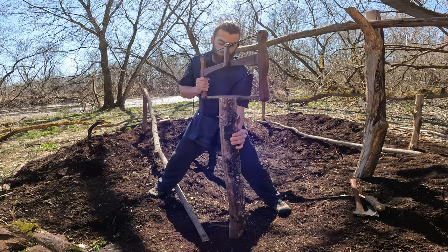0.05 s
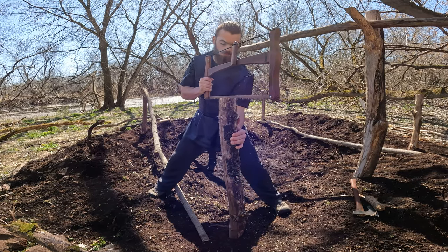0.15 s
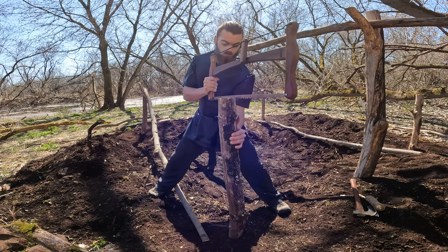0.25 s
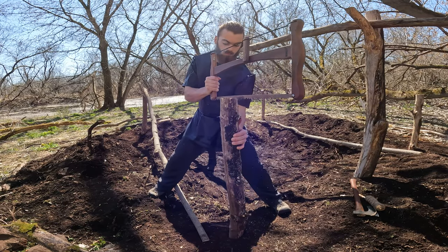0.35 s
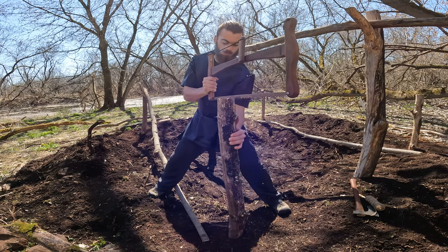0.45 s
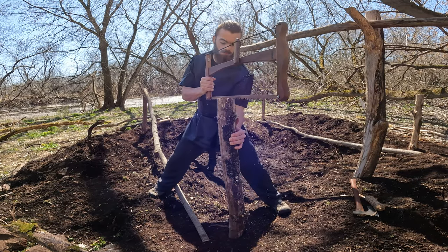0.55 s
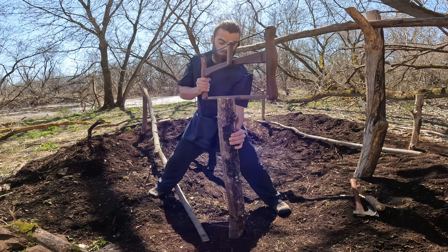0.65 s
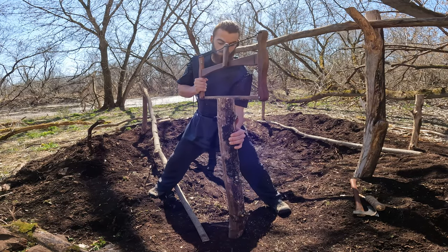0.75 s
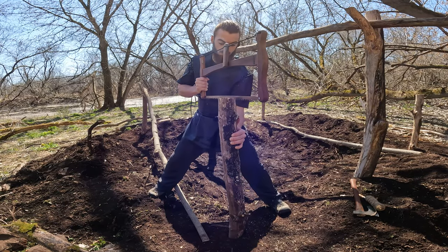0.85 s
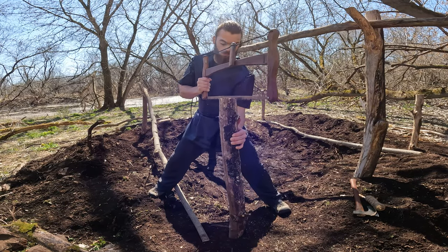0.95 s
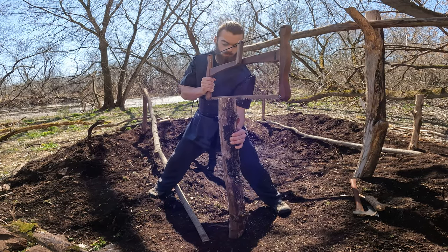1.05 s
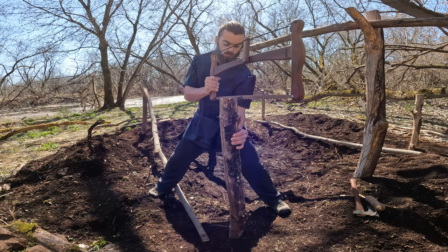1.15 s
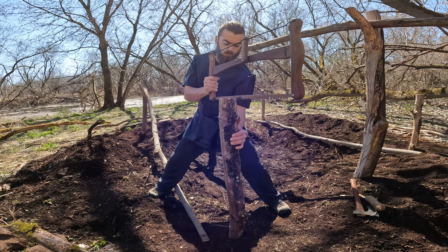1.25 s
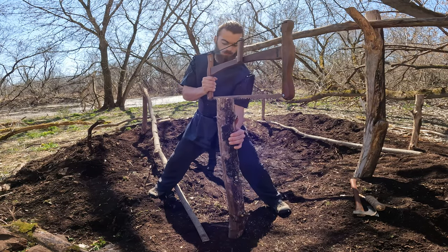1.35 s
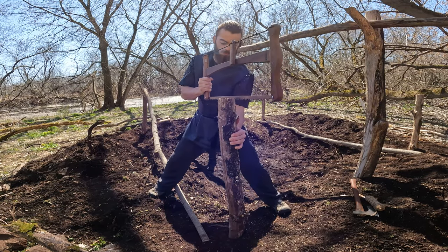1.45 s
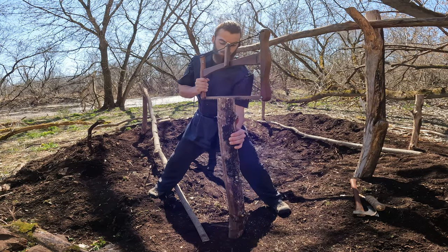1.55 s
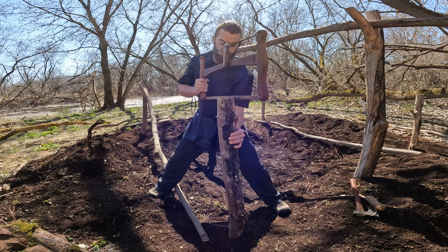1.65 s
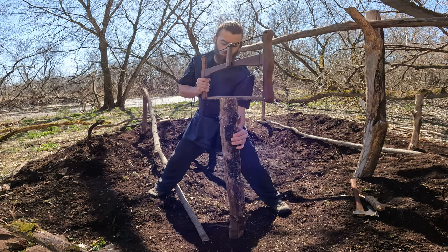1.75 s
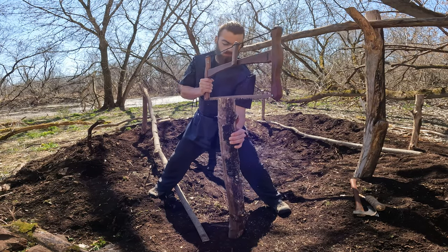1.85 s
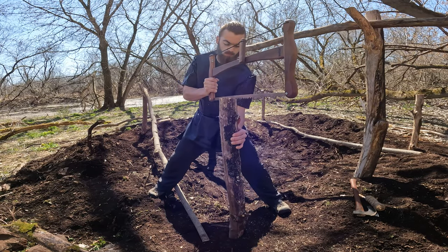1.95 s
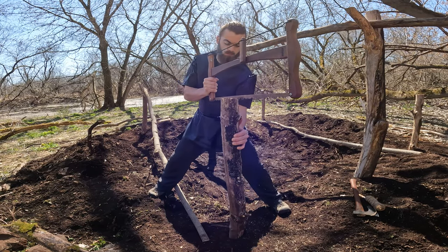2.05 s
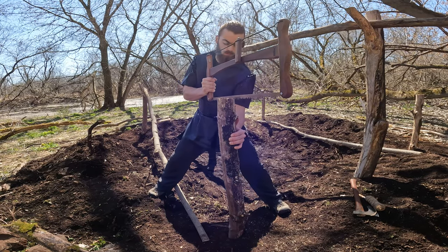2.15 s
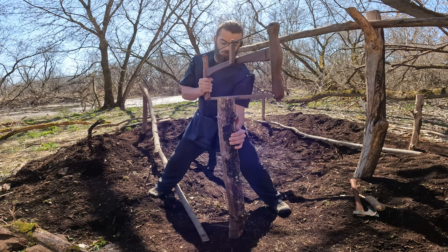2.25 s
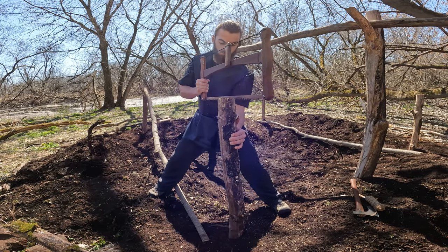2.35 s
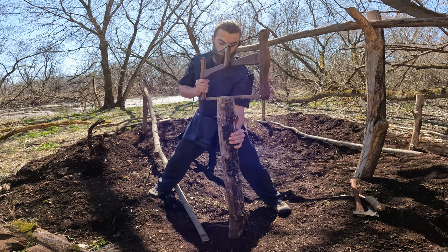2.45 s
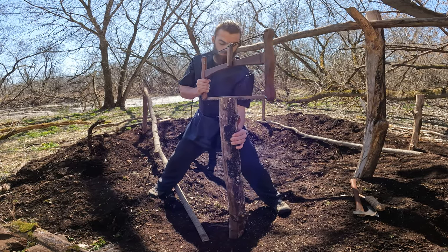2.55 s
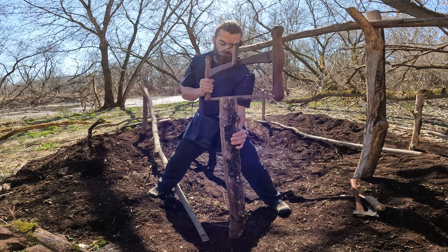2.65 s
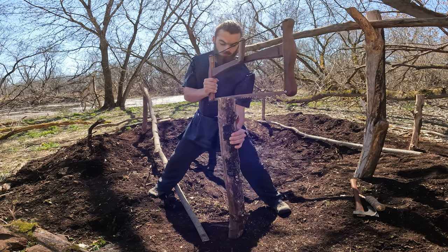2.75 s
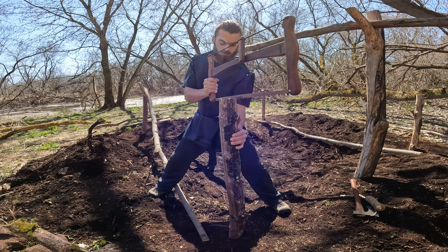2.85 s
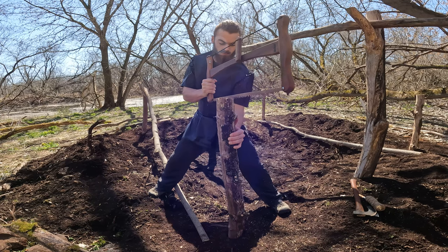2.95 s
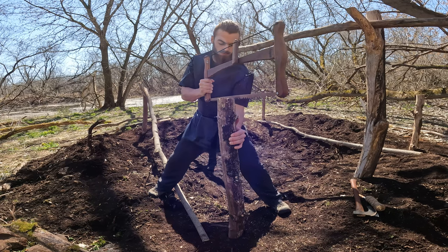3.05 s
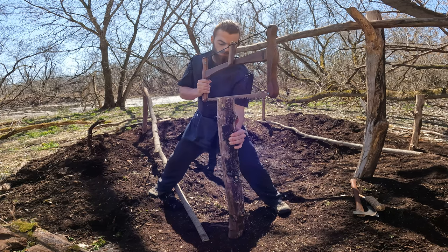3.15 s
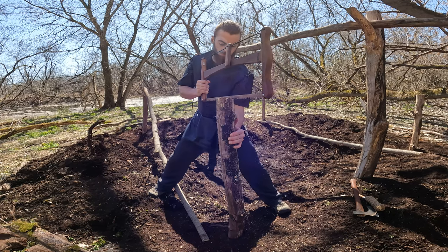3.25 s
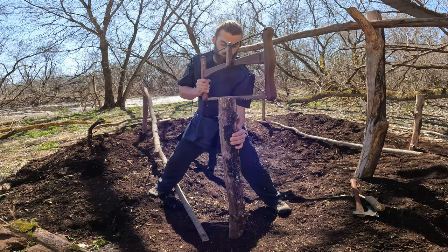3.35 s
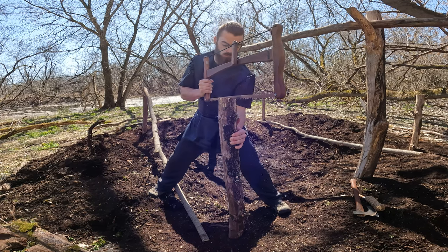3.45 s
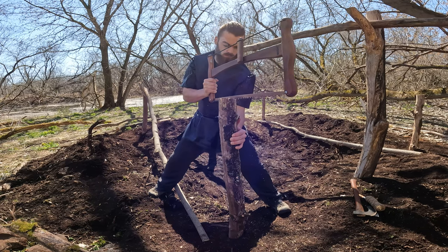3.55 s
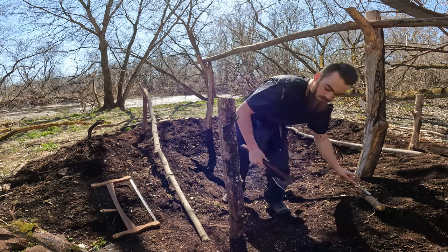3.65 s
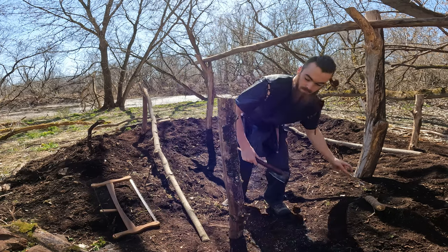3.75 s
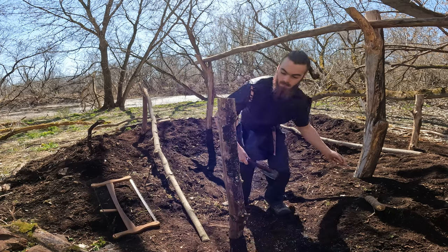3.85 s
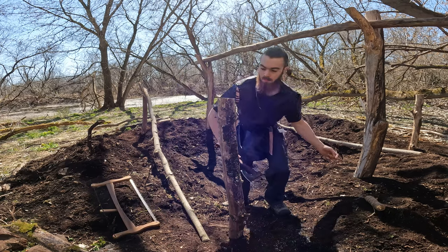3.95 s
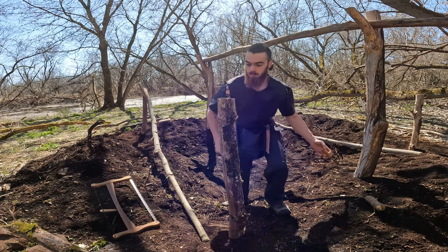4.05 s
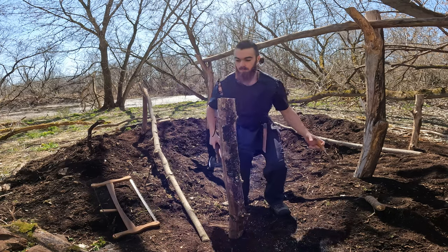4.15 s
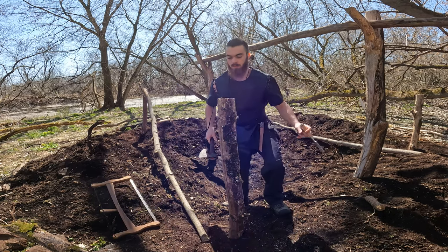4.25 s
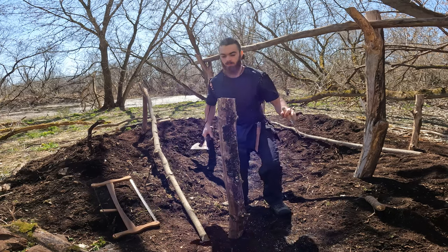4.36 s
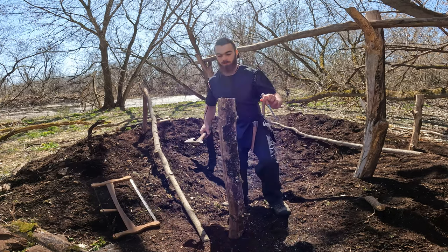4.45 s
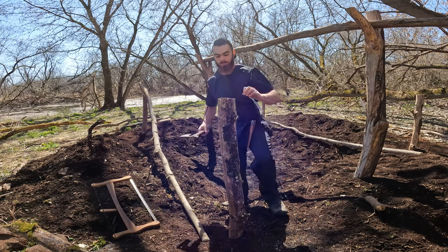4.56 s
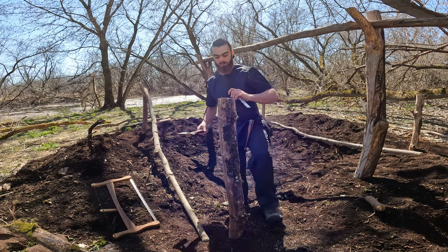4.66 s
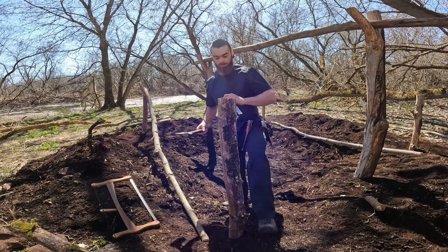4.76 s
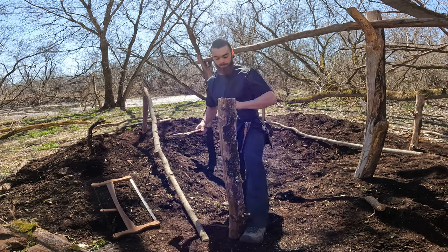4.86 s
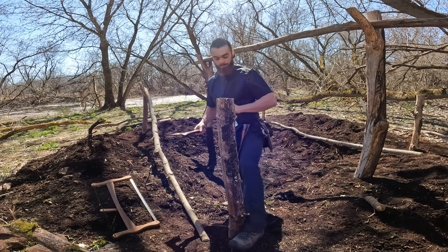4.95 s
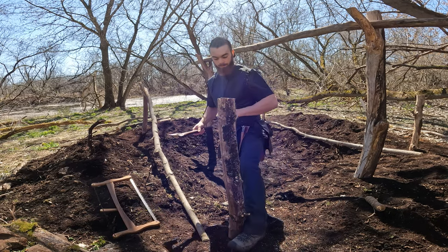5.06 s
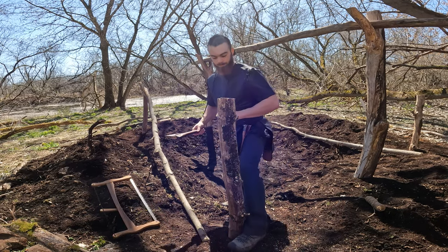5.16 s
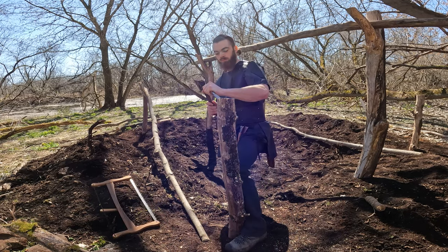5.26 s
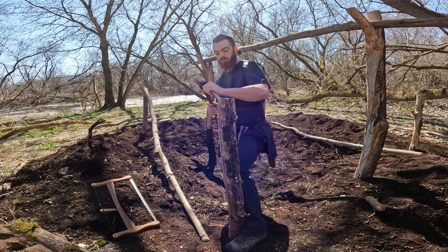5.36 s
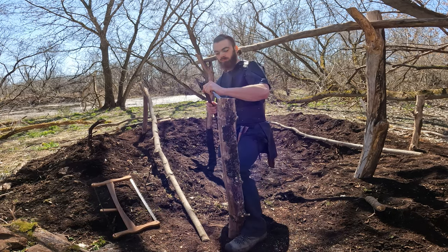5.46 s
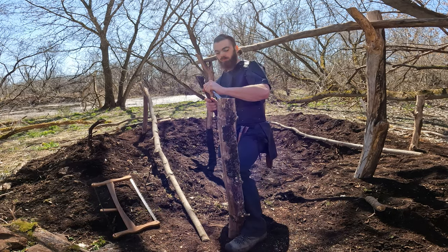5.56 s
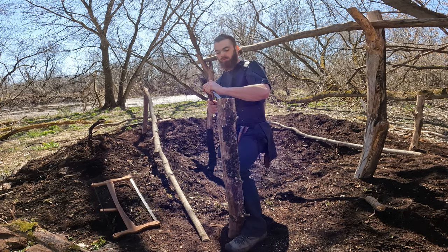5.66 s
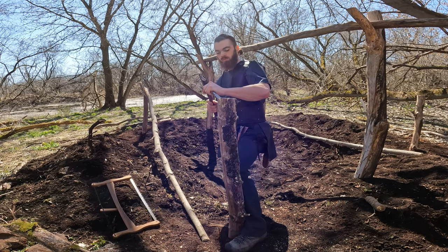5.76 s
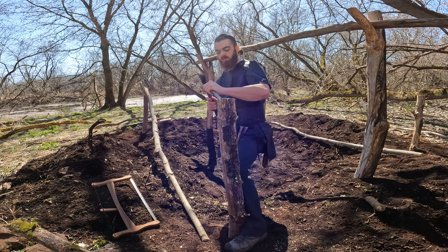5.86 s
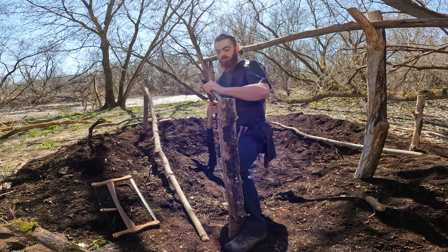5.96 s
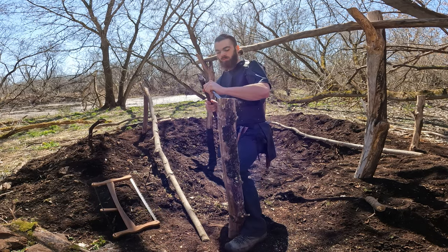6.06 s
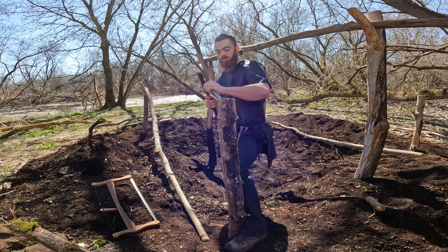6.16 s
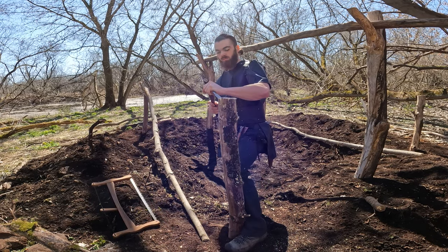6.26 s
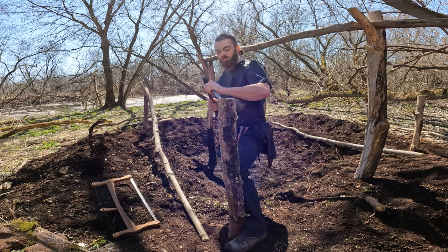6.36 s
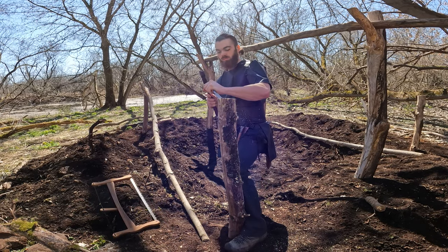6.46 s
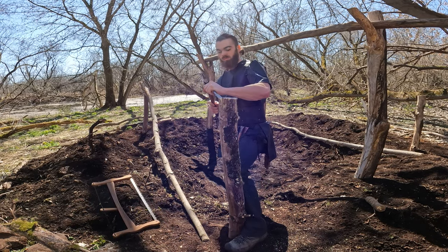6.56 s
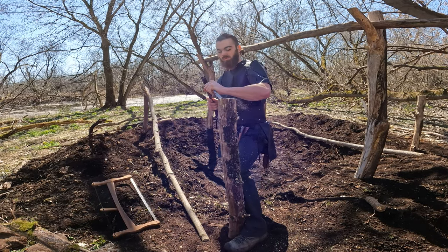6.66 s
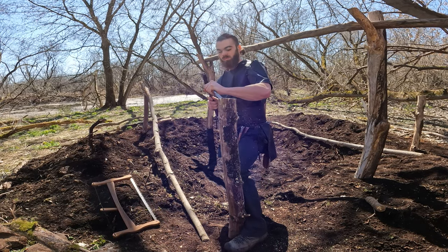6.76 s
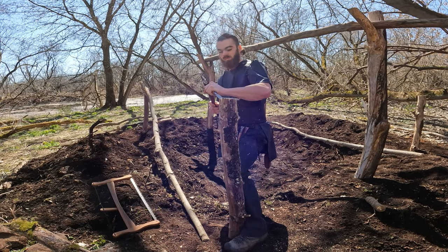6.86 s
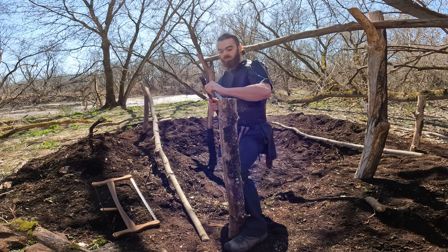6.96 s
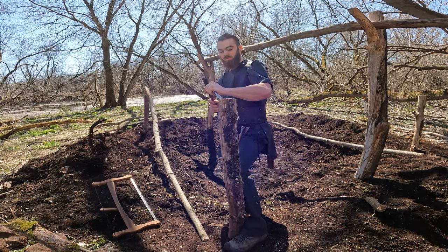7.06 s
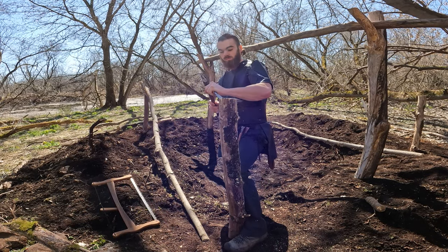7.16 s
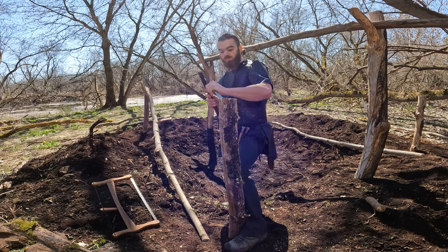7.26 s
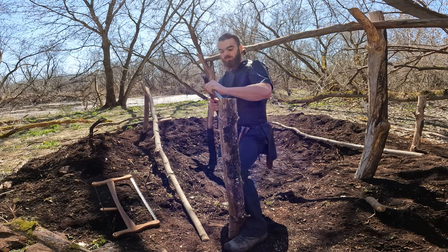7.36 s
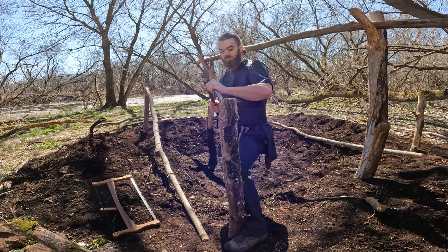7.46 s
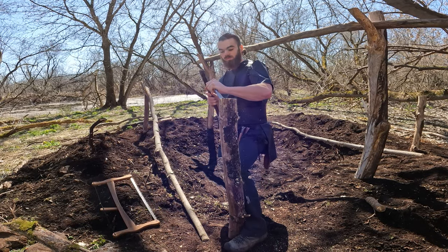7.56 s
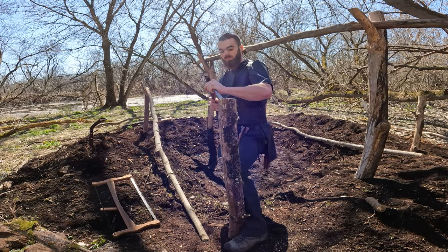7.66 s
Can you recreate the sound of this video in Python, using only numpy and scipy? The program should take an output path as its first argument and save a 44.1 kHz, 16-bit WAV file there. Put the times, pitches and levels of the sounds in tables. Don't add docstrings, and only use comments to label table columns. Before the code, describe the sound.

A bow saw rasps back and forth through a wooden post close by, then eight dry, spaced knocks tap a wedge in, outdoors.

```python
import sys
import numpy as np
from scipy import signal
from scipy.fft import rfft, irfft, next_fast_len
from scipy.io import wavfile
from scipy.ndimage import uniform_filter1d

SR = 44100
rng = np.random.default_rng(int(sys.argv[2]) if len(sys.argv) > 2 else 0)


def makeup_ratio(level_db):
    decades = np.asarray(level_db, float) / 20
    return 10 ** decades


def int16_out(signal):
    q = np.round(np.clip(np.atleast_2d(signal).T, -1, 1) * 32767)
    wavfile.write(sys.argv[1], SR, q.astype(np.int16))


N = 339570
CUT_S, LAST_CUT_S = 3.6305, 5.262
GHOST_S = 512 / 48000


def evened(x):
    return x / np.sqrt(np.mean(x ** 2) + 1e-20)


def read(points, hz):
    f, value = np.transpose(points)
    return np.interp(np.log(hz + 1), np.log(f + 1), value)


def add(mix, s, sound):
    part = mix[..., round(s * SR):][..., :sound.shape[-1]]
    part += sound[..., :part.shape[-1]]


def filtered(x, order, hz, kind="low"):
    return signal.sosfilt(signal.butter(order, hz, kind, fs=SR, output="sos"), x)


def dull(x, hz):
    return filtered(x, 6, hz)


def resonate(x, hz, width):
    r = np.exp(-np.pi * width / SR)
    return 2 * signal.lfilter([1 - r], [1, -r * np.exp(2j * np.pi * hz / SR)], x).real


def resonate_twice(x, hz, width):
    return resonate(resonate(x, hz, width), hz, width)


def body(x, modes):
    rung = [makeup_ratio(db) * resonate_twice(x, hz, 1.25 * width) for hz, width, db in modes]
    return evened(sum((-1) ** k * mode for k, mode in enumerate(rung)))


def ring(hz, t60, rise=0.):
    t = np.arange(round(.06 * SR)) / SR
    return makeup_ratio(-60 * t / t60) * (1 - np.exp(-t / (rise + 1e-5))) * np.sin(2 * np.pi * hz * t)


def patchwork(shape, bands, frames):
    patches = uniform_filter1d(rng.standard_normal(shape), size=bands, axis=0)
    return evened(uniform_filter1d(patches, size=frames, axis=1))


# (time [s], half length [s], ring gain [dB], # boom
# gain [dB])
DIGS = [(0.355, 0.036, 6, -1.5), (0.291, 0.011, -5, 2), (0.776, 0.019, 8, 3.5), (0.844, 0.03, 7.5, 0.5),
        (1.202, 0.067, 5.5, -3.5), (1.141, 0.062, 3, 8), (1.62, 0.025, 4.5, 2.5), (1.687, 0.035, 3.5, 6),
        (1.914, 0.018, -15, 2), (2.034, 0.036, 5.5, -1.5), (2.488, 0.085, 2, 10.5), (3.12, 0.016, -9, -2),
        (3.526, 0.013, -21, 0), (3.608, 0.039, -1.5, 8.5), (2.858, 0.031, 6.5, -8), (3.19, 0.019, 11, -4),
        (3.278, 0.014, 10.5, 8.5), (3.354, 0.032, 6, 4), (0.053, .012, 3.5, -2), (0.183, 0.02, -15, 1),
        (0.256, 0.01, 0.5, 2.5), (1.297, 0.01, 2.5, 1), (1.514, 0.011, -2.5, -4), (1.554, 0.022, 1, -2),
        (2.089, 0.0063, 6, 0), (2.13, 0.006, 7.5, -4), (2.568, 0.028, 5, -2), (2.763, 0.011, 6, 1),
        (2.812, .015, -3.5, 4), (2.822, 0.0061, 2, -5), (2.937, 0.013, -4, -3), (3.155, 0.008, 1.5, 6),
        (3.307, .008, -2.5, 11)]


def contact(t, full, lift, full_db, lift_db, boom_db):
    edge_s, bend = 0.045, 1.11
    enter = 17.5 * (np.maximum(full - t, 0) / edge_s) ** bend
    leave = 27 * (np.maximum(t - lift, 0) / edge_s) ** bend
    ring_gain, boom_gain = sum(np.outer([a, b], np.exp(-((t - s) / half) ** 2)) for s, half, a, b in DIGS)
    ring_db = np.interp(t, [full, lift], [full_db, lift_db]) + ring_gain - enter - leave
    boom_db = boom_db + boom_gain - 0.38 * enter + 0.18 * leave
    knock_db = -3 + 0.023 * ring_gain - 0.28 * enter + 0.37 * leave
    return ring_db, boom_db, knock_db


# (frequency [Hz], width [Hz], level [dB])
POST_BOOM = [(197.7, 66, -4.5), (300, 86.5, 2), (553, 99, -12)]
# (frequency [Hz], width [Hz], level [dB])
POST_KNOCK = [(649.5, 123, 1.5), (955, 233, -3), (1400, 650, -11), (1645, 183, -2.5)]
# (frequency [Hz], width [Hz], level [dB])
BLADE = [(2160, 453, -0.5), (2875, 234, 2), (3262, 266, 2), (3693, 180, 0)]
# (frequency [Hz], density [dB per Hz])
FIZZ = [(2500, -24), (3900, -2.5), (4300, -5), (4700, -3.5), (6100, -5), (8300, -16.5), (9500, -18.5),
        (10300, -25.5), (12500, -28.5), (14300, -45), (15300, -53)]


def stroke(row, luck):
    t = np.arange(max(row[0] - 0.09, 0), min(row[1] + 0.09, CUT_S), 1 / SR)
    ring_db, boom_db, knock_db = contact(t, *row)
    fizz_db = -6.0 - 0.091 * (ring_db + 40.5)
    chance, size, sign, slow, other = luck[round(t[0] * SR):][:len(t)].T
    strength = makeup_ratio(1.25 * np.minimum(-np.log(size + 1e-9), 4))
    bites = (chance < 7000 / SR) * strength * np.sign(sign - .5)
    catch = evened(resonate(slow - .5, 94, 440))
    clump = evened(resonate(slow - .5, 22, 33))
    grip = makeup_ratio(2.0 * catch + 0.067 * clump)
    shared, apart = evened(bites * grip), evened((other - .5) * grip)
    pair = np.array([shared + 0.076 * apart, shared - 0.38 * apart])
    length = next_fast_len(len(t))
    colour = makeup_ratio(read(FIZZ, np.fft.rfftfreq(length, 1 / SR)))
    fizz = irfft(rfft(pair, length) * colour, length)[:, :len(t)]
    boom = makeup_ratio(boom_db) * body(shared, POST_BOOM)
    knock = makeup_ratio(knock_db) * body(shared + 0.54 * (pair - shared), POST_KNOCK)
    sound = makeup_ratio(ring_db) * (boom + knock + body(pair, BLADE) + makeup_ratio(fizz_db) * evened(fizz))
    edge = np.minimum(1, np.minimum(t - t[0] + 0.0007, t[-1] - t) / 0.0032)
    return t[0], sound * edge


# (teeth fully in [s], teeth lifting [s], blade ring when in [dB],
# blade ring at lifting [dB], post boom over the ring [dB])
STROKES = [
    (0.0, 0.037, -34.5, -46, -3.5),
    (0.245, 0.419, -35, -34, 1.5),
    (0.682, 0.915, -39, -44.5, 0.5),
    (1.081, 1.285, -40, -36.5, 0),
    (1.514, 1.726, -37, -43, -2),
    (1.982, 2.077, -29, -37, 0),
    (2.363, 2.521, -39, -40.5, -8),
    (2.725, 2.9, -40, -31.5, 1),
    (3.158, 3.351, -41.5, -46.5, -5.5),
    (3.573, 3.618, -38.5, -26.5, -9),
]


def bow_saw():
    saw, luck = np.zeros((2, N)), rng.random((N // 2, 5))
    for row in STROKES:
        add(saw, *stroke(row, luck))
    return saw


def mottled(x):
    z = signal.stft(x, nperseg=256)[2]
    grain_db = 2 * patchwork(z.shape[1:], 3, 7)
    return signal.istft(z * makeup_ratio(grain_db), nperseg=256)[1][:, :N]


# (frequency [Hz], t60 [s], level [dB], what drives it, sign of first motion)
TAP_MODES = [(135, .0036, 21, "post", 1), (152, .031, -2.7, "post", -1), (315, .0245, 1.2, "post", -1),
             (571, .0095, 3.9, "seated", -1), (616, .0029, 5.6, "seated", 1),
             (1212, .0087, -8.5, "seated", -1), (1657, .018, -8, "seated", -1),
             (1139, .004, 15, "split", 1), (1180, .0063, 11, "split", -1), (1792, .0108, -12.8, "edge", 1),
             (1984, .0118, -15.6, "edge", 1), (1050, .02, 0.1, "loose", -1), (2090, .012, -5, "loose", -1),
             (1320, .016, -10, "seated", -1)]
# (frequency [Hz], t60 [s], level [dB], what drives it, signed first motion)
TOOL_MODES = [(2810, 0.0065, -2, "crack", 0.92), (3740, 0.0076, -15, "crack", -0.56),
              (4700, 0.011, -13, "crack", -1.07), (7730, 0.0065, -18, "crack", 1)]
ARRIVE_S = dict(post=0, crack=.00024, seated=.00048, edge=.00072, loose=.00087, split=.00103)


def tap(blow_db, seated_db, loose_db, crack_db):
    modes, t = TAP_MODES + TOOL_MODES, np.arange(round(.065 * SR)) / SR
    detune = 1 + .004 * rng.standard_normal(len(modes))
    drive = dict(post=0, seated=seated_db, loose=loose_db, crack=crack_db,
                 edge=3 * seated_db, split=0.1 * seated_db)
    grit = resonate_twice(rng.standard_normal(len(t)), 2600, 3200)
    sound = evened(grit) * makeup_ratio(crack_db - 14.5 - 60 * t / 0.024)
    for (hz, t60, db, by, way), d in zip(modes, detune):
        add(sound, ARRIVE_S[by], way * makeup_ratio(db + drive[by]) * ring(hz * d, t60, rise=0.057 / hz))
    return makeup_ratio(blow_db) * filtered(sound, 2, [75, 7400], "band")


# (time [s], blow [dB], seated-wedge ring [dB], loose-wedge ring [dB], crack [dB])
TAPS = [
    (5.5519, -4.5, -3.5, -4, -9),
    (5.84, -0.5, -1.5, -9.5, -7),
    (6.1298, -1.5, 1.5, -13, -1.5),
    (6.4008, 1, 0, -27, 0),
    (6.6974, 0.5, 1.5, -31, -3.5),
    (6.9693, -0.5, 2, -25.5, -1.5),
    (7.2509, -1, 2, -14.5, -6.5),
    (7.5471, -2, 2.5, -17.5, -1),
]


def wedge_blows():
    blows, slaps, cracks, carried = np.zeros((4, N))
    for s, blow_db, seated_db, loose_db, crack_db in TAPS:
        blow = tap(blow_db, seated_db, loose_db, crack_db)
        rebound = tap(blow_db - 33.5, seated_db, loose_db, crack_db - 44)
        add(blows, s, blow)
        add(blows, s + 0.034, rebound)
        add(slaps, s + .0475, makeup_ratio(blow_db + crack_db - 38) * ring(4300, 0.0065, rise=.0003))
        add(cracks, s, makeup_ratio(np.array([blow_db + 0.74 * crack_db])))
        add(carried, s, makeup_ratio(0.5 * seated_db) * blow)
    return blows, slaps, cracks, carried


def soil(x):
    late = np.zeros_like(x)
    add(late, 0.0026, signal.lfilter([.35], [1, -.65], x))
    return x + makeup_ratio(-28.5) * late


# (time [s], level [dB], #
# frequency [Hz], t60 [s])
TICKS = [(.557, -48, 6600, 0.0029), (1.466, -41, 6770, 0.0054), (1.939, -45, 3000, .005),
         (3.154, -28, 3000, .005), (3.549, -30, 4000, .005), (2.311, -39, 6600, 0.0055),
         (2.622, -37, 6500, 0.0011), (3.7063, -26, 6470, 0.0095), (3.706, -38, 2980, 0.0042),
         (3.766, -34, 424, 0.017), (3.962, -40, 358, 0.049), (4.358, -22.5, 1230, 0.0043),
         (4.357, -39, 2690, 0.0032), (4.70, -37, 970, 0.01), (5.012, -17, 680, 0.0026),
         (5.076, -26.5, 300, 0.014), (5.22, -54, 3000, .006), (5.2637, -23, 5100, 0.00025),
         (5.654, -46.5, 8800, 0.0023), (6.438, -15, 314, 0.015), (6.438, -22.5, 920, 0.0087),
         (4.356, -30.5, 460, 0.012), (7.077, -46, 7060, 0.0028), (7.157, -54, 4500, 0.0048)]
# (time [s], level [dB])
CREAKS = [(0.455, -37), (0.473, -40), (.499, -50), (.558, -53), (1.395, -50), (1.767, -47), (1.82, -54),
          (2.975, -51), (2.987, -41), (3.025, -50), (3.487, -56)]
# (time [s], level [dB])
SNAPS = [(5.048, -56.5), (5.073, -51), (5.095, -55.5), (5.14, -53), (5.6445, -60.5), (5.677, -67),
         (5.73, -62), (6.25, -53), (6.615, -72), (6.919, -58.5), (7.335, -50), (7.35, -62), (5.94, -60),
         (6.745, -61)]


def ticks_creaks_snaps():
    out = np.zeros(N)
    creaks = [(s, db, 3130, 0.019) for s, db in CREAKS]
    for s, db, hz, t60 in TICKS + creaks:
        add(out, s, makeup_ratio(db) * ring(hz, t60, rise=0.42 / hz))
    for (s, db), hz in zip(SNAPS, rng.uniform(3500, 9500, (len(SNAPS), 3))):
        add(out, s, makeup_ratio(db) * sum(ring(f, 0.0022, rise=.00015) for f in hz))
    return out


def two_ports(near):
    late = np.roll(near[0], shift=1)
    late += 0.54 * filtered(late, 2, 5500, "high")
    near = makeup_ratio([[-.8], [.8]]) * np.array([late, near[1]])
    return near + signal.lfilter([.03], [1, -.97], near.mean(0) - near)


# (frequency [Hz], t60 [s])
TREES = [(200, 0.15), (1000, 1), (3000, 1.0), (8000, 0.65), (14000, 0.41)]


def trees(x, start, end):
    taps, out = np.zeros((2, SR // 2)), np.zeros((2, N))
    slots = np.arange(300, SR // 2 - 20, 20)
    at = slots + rng.integers(0, 20, (2, len(slots)))
    np.put_along_axis(taps, at, rng.choice([-1., 1.], at.shape), 1)
    hz, t, z = signal.stft(taps, SR, nperseg=256)
    clumps = makeup_ratio(2.6 * patchwork(z.shape[1:], 6, 2))
    thin = np.clip(hz / 2500, .1, 1)[:, None]
    clearing = 0.3 + 0.62 / (1 + (t / 0.14) ** 8)
    decay = makeup_ratio(-60 * t / read(TREES, hz)[:, None])
    tail = signal.istft(z * thin * clearing * clumps * decay, SR, nperseg=256)[1]
    tail[1] = 0.24 * tail[0] + 0.71 * tail[1]
    shot = x[None, round(start * SR):round(end * SR)]
    echo = signal.fftconvolve(shot, tail / np.linalg.norm(tail[0]), axes=1)
    add(out, start, echo[:, :shot.shape[1]])
    return out


def woodland_echo(saw, cracks, carried):
    cracks = filtered(dull(cracks, 8800), 2, 5000)
    far = makeup_ratio(-12.5) * cracks + makeup_ratio(-26.5) * resonate_twice(carried, 1900, 1000)
    turn = np.searchsorted(np.transpose(TAPS)[0], np.arange(N) / SR + GHOST_S) % 3
    echo = sum(trees(far * (turn == k), LAST_CUT_S, N / SR) for k in range(3))
    return echo + makeup_ratio(-30) * trees(saw[0], 0, CUT_S)


# (time [s], length [s], start frequency [Hz], level [dB])
WHISTLES = [(0.081, 0.14, 6830, -68.5), (0.51, 0.11, 6880, -67), (6.915, .04, 6700, -76),
            (0.95, 0.095, 5130, -76), (1.4, .045, 5080, -66), (5.272, 0.09, 5100, -74),
            (5.392, 0.09, 5100, -72), (5.51, 0.09, 5100, -69), (5.62, 0.084, 5100, -75)]
# (time [s], level [dB])
CHIRPS = [(5.268, -62), (5.356, -59.5), (5.473, -61), (5.585, -66.5)]
# (time after [s], length [s], start [Hz], end [Hz], level [dB], fuzz [Hz])
CHIRP_PARTS = [(0, 0.03, 4000, 3500, -4, 100), (0.015, 0.081, 3740, 3470, -10, 280)]
# (time [s], length [s], start [Hz], end [Hz], level [dB], fuzz [Hz])
BUZZ = (6.06, .07, 5000, 4970, -66, 900)


def birds():
    out = np.zeros(N)
    notes = [(s, length, hz, .983 * hz, db, 50) for s, length, hz, db in WHISTLES] + [BUZZ]
    for s, db in CHIRPS:
        for later, length, hz0, hz1, part_db, fuzz_hz in CHIRP_PARTS:
            notes.append((s + later, length, hz0, hz1, db + part_db, fuzz_hz))
    for s, length, hz0, hz1, db, fuzz_hz in notes:
        hz = np.linspace(hz0, hz1, round(length * SR))
        breath = rng.standard_normal((2, SR // 4))
        a, b = filtered(breath, 3, fuzz_hz)[:, -len(hz):]
        tone = ((a + 1j * b) * np.exp(2j * np.pi * np.cumsum(hz) / SR)).real
        add(out, s, makeup_ratio(db - 5) * evened(tone) * signal.windows.tukey(len(hz), .35))
    return out


def swells(bed_db, rows):
    t = np.arange(0, N, 32) / SR
    bed = makeup_ratio(np.array(bed_db))[np.searchsorted([CUT_S, LAST_CUT_S], t)]
    power = sum(makeup_ratio(db) ** 2 * np.exp(-abs((t - s) / half) ** 3.0) for s, half, db in rows)
    return np.repeat(np.sqrt(bed ** 2 + power), repeats=32)[:N]


# (frequency [Hz], likeness [0-1])
SAME = [(60, 0.71), (130, 0.84), (290, 0.8), (1400, 0.67), (6800, 0.68), (15000, .3)]


def air(spectrum, gain, patchy_db, flicker_db):
    frames, hz = N // 256 + 5, np.fft.rfftfreq(512, 1 / SR)
    a, b, c, d = rng.standard_normal((4, 257, frames))
    flicker = rng.standard_normal(frames)
    patches = patchwork((257, frames), 7, 12)
    same, left = np.clip(read(SAME, hz), 0, 1)[:, None], a + 1j * b
    z = np.array([left, same * left + np.sqrt(1 - same ** 2) * (c + 1j * d)])
    z *= makeup_ratio(read(spectrum, hz)[:, None] + patchy_db * patches + flicker_db * flicker)
    noise = signal.istft(z, window="cosine", nperseg=512, noverlap=256)[1][:, :N]
    return gain * evened(noise)


# (frequency [Hz], density [dB per Hz])
LEAVES = [(600, -27.5), (1500, 1), (3000, -3.5), (4500, -6), (6200, -5.5), (8000, -10), (9500, -18.5),
          (12000, -16.5), (13000, -29.5), (14200, -44.5)]
# (centre time [s], half length [s], level [dB])
RUSTLES = [(0, 0.25, -90), (2.3, 0.033, -67), (3.1, 0.028, -60), (3.515, 0.033, -67.5), (3.75, 0.054, -65),
           (3.98, 0.13, -63.5), (4.3, 0.17, -67), (4.65, .1, -66.5), (5.085, 0.025, -51),
           (5.13, 0.026, -59), (5.22, .05, -71), (7.1, 1, -75)]


def rustling_leaves():
    t = np.arange(N) / SR
    leaves = dull(air(LEAVES, swells([-72, -71, -79], RUSTLES), 1.3, 1.2), 12800)
    return np.where((t > LAST_CUT_S) & (t < TAPS[0][0]), dull(leaves, 7800), leaves)


def tyre_hiss():
    t = np.arange(N) / SR
    rise = makeup_ratio(-13 / (1 + np.exp((t - 6.66) / .06)))
    hiss = filtered(rng.standard_normal((2, N)), 5, [1300, 2200], "band")
    return makeup_ratio(-62.5) * (t > LAST_CUT_S) * rise * evened(hiss)


# (frequency [Hz], density [dB per Hz])
WASH = [(90, -24), (130, 13), (200, -6.5), (300, -8), (600, -11), (1200, -11.5), (1700, -23.5), (2300, -48),
        (4000, -45.5), (9000, -57.5), (13000, -86.5)]
# (centre time [s], half length [s], level [dB])
CARS = [
    (.5, 0.42, -56.5),
    (3.95, 0.076, -51.5),
    (5.1, 0.14, -56.5),
    (6, 0.6, -55),
]


def road_wash():
    return dull(air(WASH, swells([-58, -56, -58], CARS), 1.5, 0.46), 5000)


# (frequency [Hz], density [dB per Hz])
RUMBLE = [(12, -8.5), (25, 0.5), (40, -4), (60, -2.5), (75, -2), (100, -12), (125, -15.5), (170, -21),
          (260, -45), (500, -80), (3000, -78.5), (8000, -79.5), (9000, -120)]
# (centre time [s], half length [s], level [dB])
GUSTS = [(.8, 0.49, -37.5), (1.498, 0.1, -36.5), (2.2, 0.87, -42), (2.797, 0.063, -35), (4.654, 0.16, -43),
         (5.54, 0.48, -40.5), (6.348, 0.19, -35.5), (6.73, 0.088, -37)]
# (centre time [s], half length [s], level [dB])
ENGINES = [(1.5, 0.51, -49), (2.6, 1, -47), (4.08, 0.26, -41), (4.8, 0.18, -35), (5.08, 0.14, -34.5),
           (5.5, 0.41, -39), (6.1, 0.49, -55)]


def low_rumble():
    hz, t, note_hz = np.fft.rfftfreq(N, 1 / SR), np.arange(N) / SR, 88.6
    mono, other, wobble = rfft(rng.standard_normal((3, N)))
    wide = other * np.clip(55 / (hz + 1), .3, 1.6)
    bass = irfft(np.array([mono + 0.17 * wide, mono - 0.19 * wide]) * makeup_ratio(read(RUMBLE, hz)), N)
    drift = evened(irfft(wobble * (hz < 3), N))
    note = np.sin(2 * np.pi * np.cumsum(note_hz + 2.49 * drift) / SR)
    note += 0.31 * evened(irfft(wobble / (1 + ((hz - note_hz) / 6) ** 2), N))
    octave = irfft(wobble / (1 + ((hz - 180) / 5) ** 2), N) * (t > LAST_CUT_S)
    bass = makeup_ratio(-0.3) * swells([-42, -42, -41], GUSTS) * evened(bass)
    note = swells([-53.5, -64, -53], ENGINES) * evened(note)
    return bass + note + makeup_ratio(-65) * evened(octave)


def scene():
    saw = bow_saw()
    blows, slaps, cracks, carried = wedge_blows()
    near = mottled(saw) * (np.arange(N) / SR < CUT_S) + soil(blows) + slaps + ticks_creaks_snaps()
    close = two_ports(near) + woodland_echo(saw, cracks, carried)
    return close + birds() + rustling_leaves() + tyre_hiss() + road_wash() + low_rumble()


def early(x, s):
    shift = round(s * SR)
    return np.pad(x[:, shift:], ((0, 0), (0, shift)))


def low_pass(x):
    return signal.sosfilt(signal.butter(12, 15770, fs=SR, output="sos"), x)


def record(dry):
    thin = filtered(dry, 3, [900, 5600], "band")
    out = dry.copy()
    for k, db in enumerate([-22.5, -35, -50]):
        out += makeup_ratio(db) * early(thin, (k + 1) * GHOST_S)
    out = np.pad(out, ((0, 0), (127, 127)), "reflect")
    band_limit = signal.firwin(255, 15750, window=("kaiser", 9), fs=SR)
    out = signal.oaconvolve(out, band_limit[None], "valid", axes=1)
    out = np.tanh(out / 1.702) * 1.57
    return low_pass(out)


dry = scene()
out = record(dry)
int16_out(out)
```